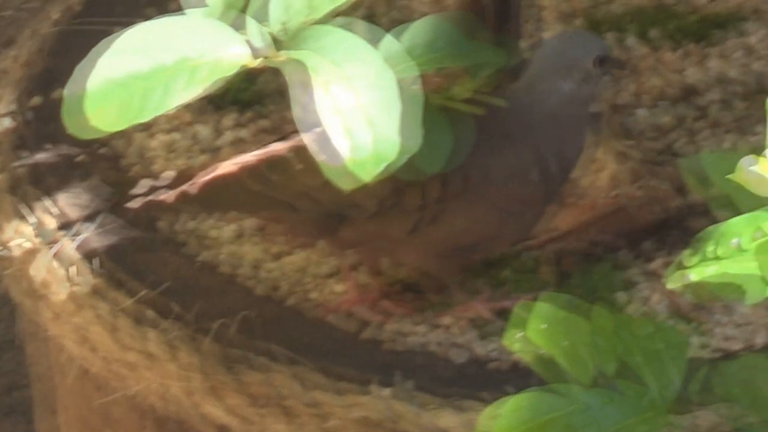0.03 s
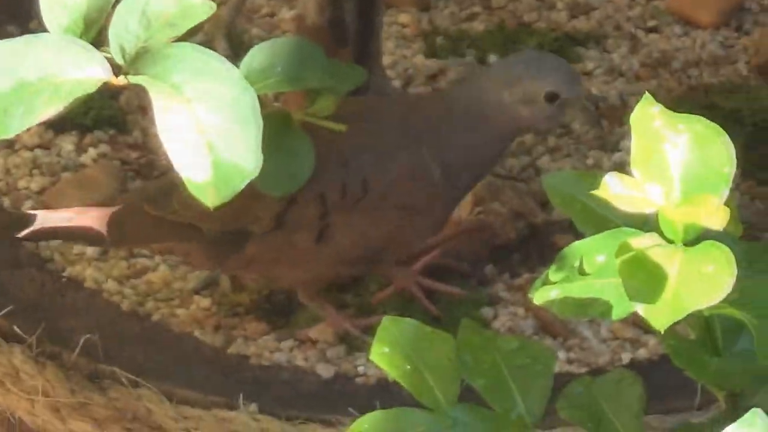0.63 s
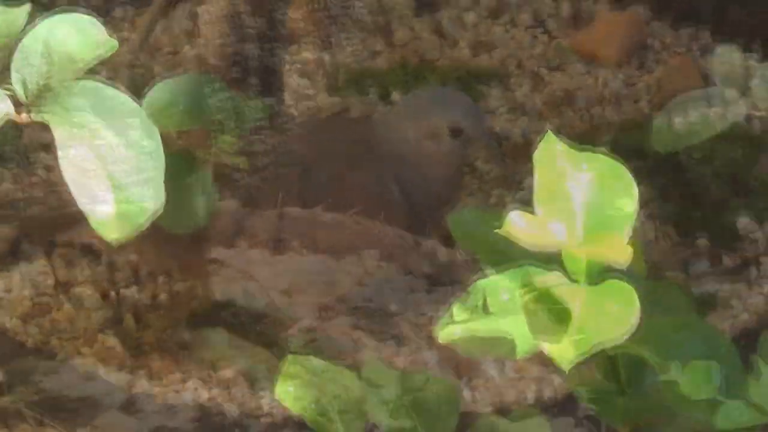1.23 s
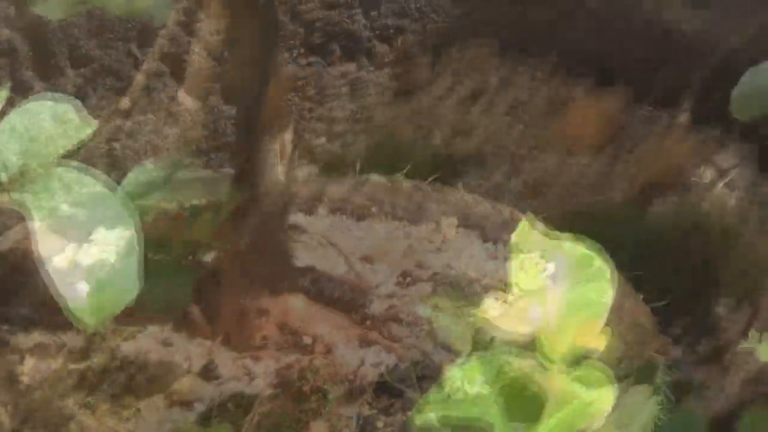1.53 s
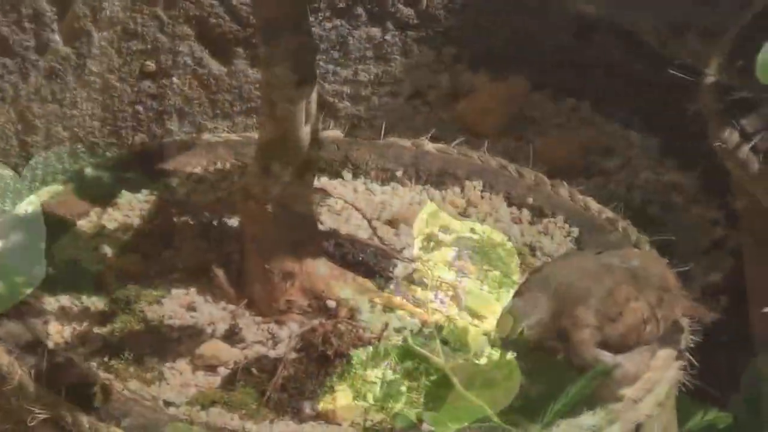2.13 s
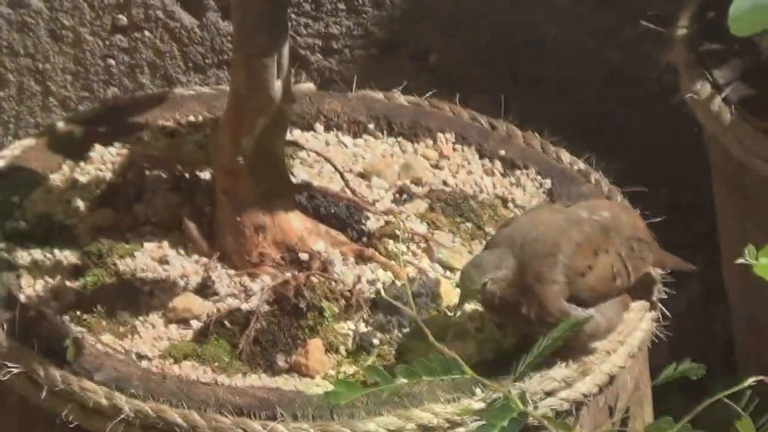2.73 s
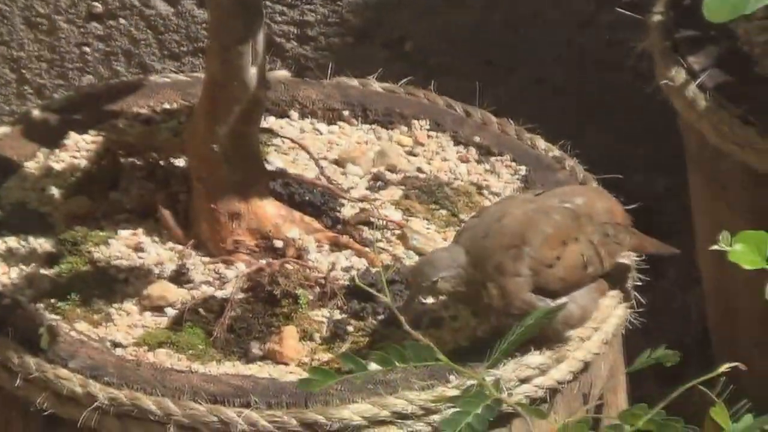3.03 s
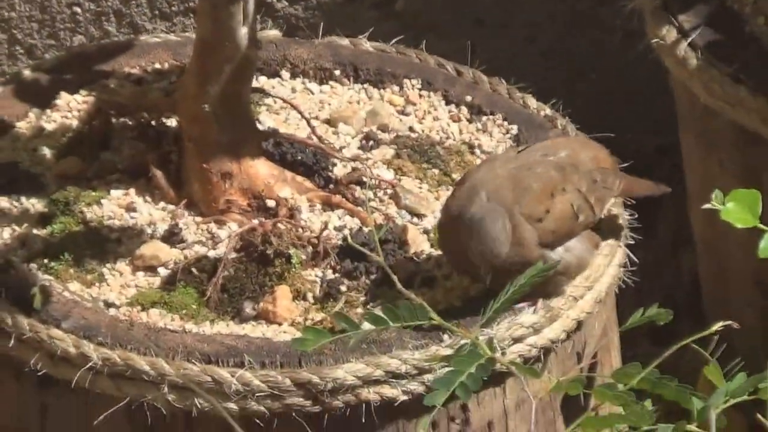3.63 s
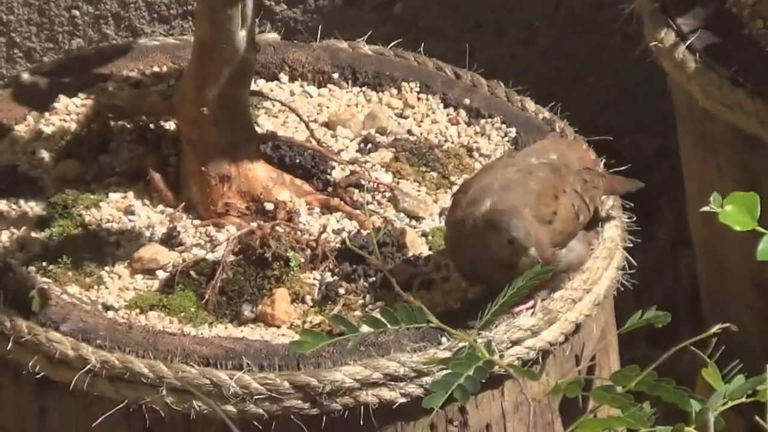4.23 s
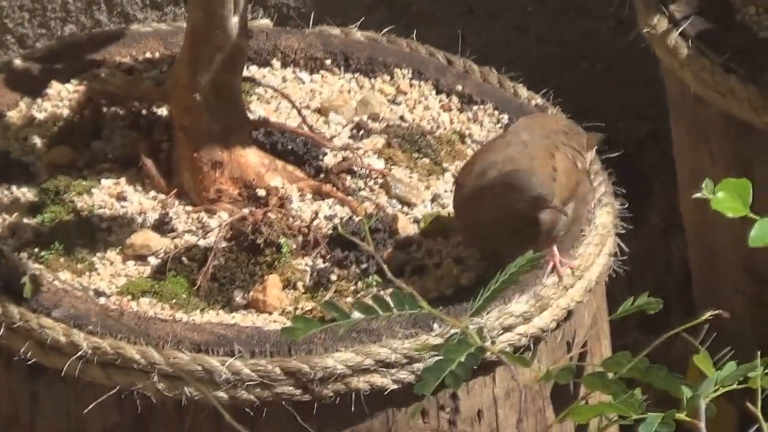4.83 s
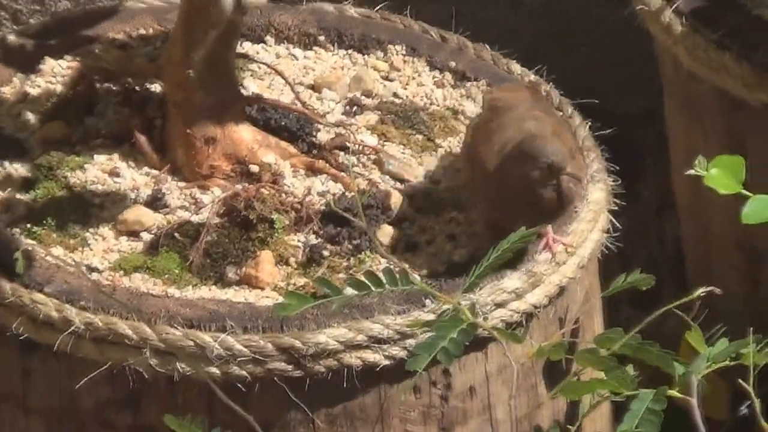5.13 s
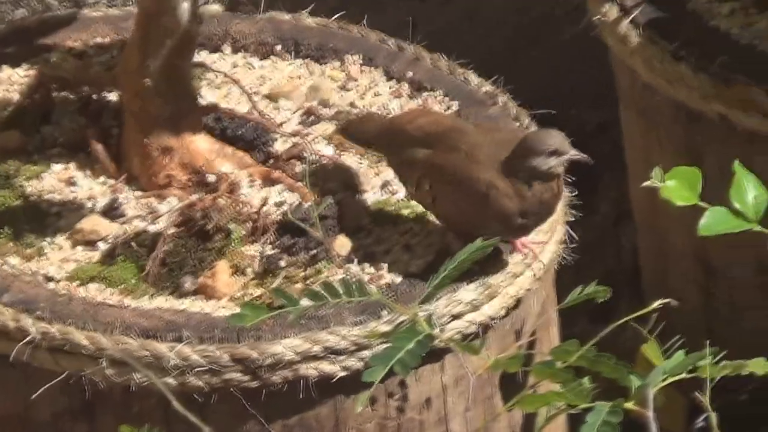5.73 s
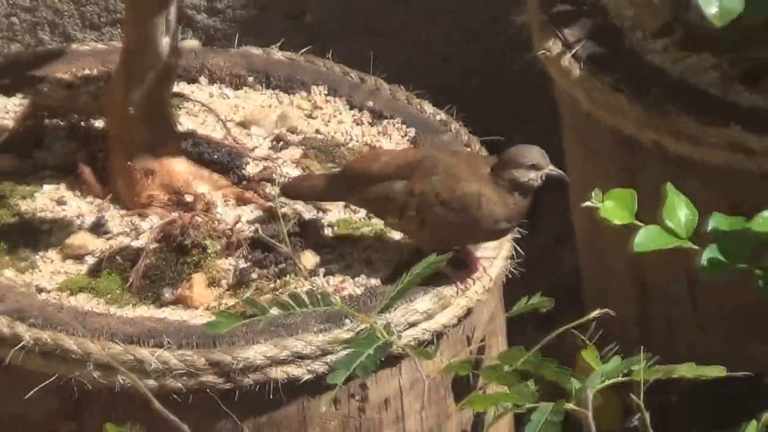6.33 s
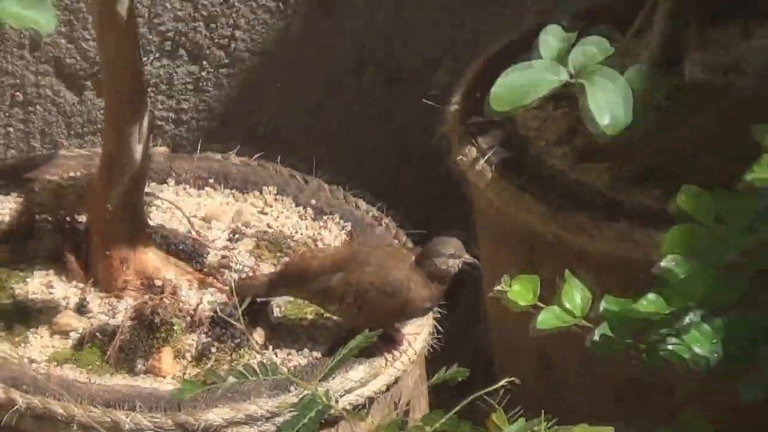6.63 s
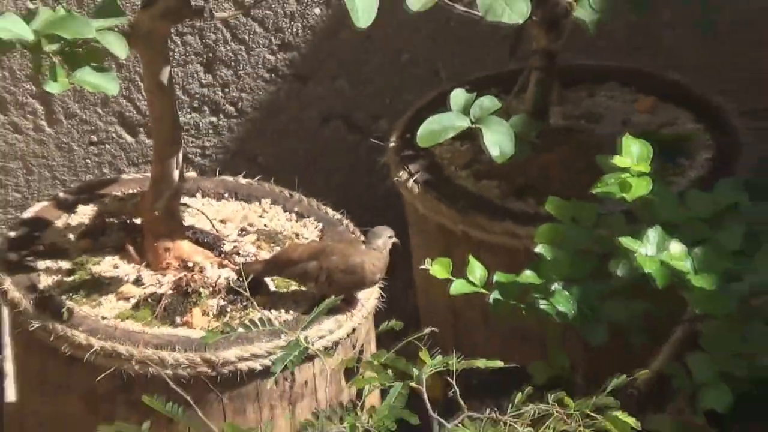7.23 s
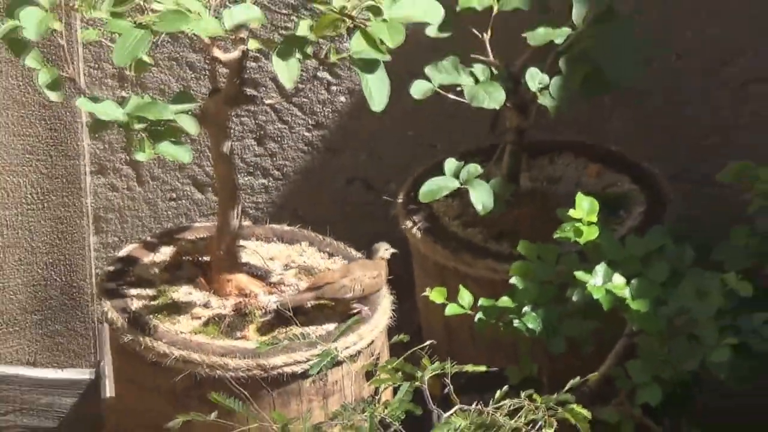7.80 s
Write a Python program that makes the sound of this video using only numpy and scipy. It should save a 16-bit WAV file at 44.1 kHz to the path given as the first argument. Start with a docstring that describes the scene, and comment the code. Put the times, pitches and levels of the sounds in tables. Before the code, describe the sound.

A dove coos softly six times while a small bird chips and trills nearby, over a distant town hum.

```python
"""The hum and rush of a town fill a walled backyard, with faint hoots and bird calls from far off.
Within the first second a ground dove begins six soft two-part coos, near-pure tones hummed through a
closed beak about once a second. From 2.3 s a dove pecks and shuffles in the gravel of a plant pot.
At 4.5 s a small bird bursts into falling chips and a high trill, swept whistles that reverberate
between the walls. After the last coo it closes with a motif sung three times, ever softer."""
import sys
import numpy as np
from scipy import signal
from scipy.fft import rfft, irfft, next_fast_len
from scipy.io import wavfile
from scipy.ndimage import uniform_filter1d, map_coordinates

SR = 44100
rng = np.random.default_rng(int(sys.argv[2]) if len(sys.argv) > 2 else 0)


def put_to_file(sound):
    """Save the sound as 16-bit audio at rate SR, in the file named by the first command-line argument."""
    columns = np.atleast_2d(sound).T  # one column per channel
    safe = np.clip(columns, -1, 1)
    whole_steps = np.round(safe * 32767)
    wavfile.write(sys.argv[1], SR, whole_steps.astype(np.int16))


N = 355578

# diffuse-field coherence of the two microphones: frequency_hz, coherence
COHERENCE = [(60, .45), (180, .38), (500, .66), (700, .52), (1150, .88), (1720, .15), (2350, .85),
             (2950, .25), (3500, .78), (4200, .3), (6000, .55), (8500, .62), (11000, .3), (15000, .3)]
# left microphone relative to right: frequency_hz, gain_db
LEFT_GAIN = [(60, 2), (180, .3), (550, .7), (1650, -1.1), (3800, -1), (6000, -6), (8300, -5), (10000, -7),
             (15000, -10)]
# left microphone behind right: frequency_hz, phase_rad
LEFT_LAG = [(60, 0), (330, 1), (505, 1), (535, .5), (1100, .1), (1650, .3), (1800, 3.1), (2800, 3.3),
            (3000, 6), (3900, 6.6), (4500, 9.3), (6000, 12.7), (7200, 15.6), (8400, 18.9), (15000, 34.5)]
# reverberation time of the yard: frequency_hz, t60_s
YARD_DECAY = [(400, 0.33), (3500, 0.47), (8000, .42), (14000, 0.45)]

# slow course of the traffic, before its gains: time_s, body_db, rush_db
TRAFFIC_LEVELS = [(0.1, -53, -62), (0.76, -56.5, -65), (0.98, -56, -66), (3.15, -54.5, -63),
                  (4.21, -56.3, -63.5), (5.0, -53, -62), (5.35, -53.5, -63), (5.7, -54, -61.5),
                  (6.4, -54.5, -62.5), (7.5, -56.5, -65.5), (7.77, -56, -63), (8.0, -54, -62)]
# noise spectra of traffic body, traffic rush and fine hiss: frequency_hz, density_db
BODY_SPECTRUM = [(18, -20), (30, -17), (50, -0.5), (90, -2), (160, -7), (250, -1.5), (340, 1.5), (430, 0),
                 (600, -5.5), (900, -17.5), (2000, -64)]
RUSH_SPECTRUM = [(250, -35), (500, -2.5), (700, -1.5), (1000, -4.5), (1500, -10.5), (2000, -10.5),
                 (2500, -30.5), (5000, -23.5)]
HISS_SPECTRUM = [(900, -6), (1800, -6.5), (2800, 5), (3700, 2.5), (5000, -1.5), (7000, -3), (8800, -3),
                 (10000, -6), (11300, -3), (12500, -13.5), (15500, -10)]
# course of the engine drone: time_s, level_db
DRONE_LEVELS = [(0.0, -67), (0.09, -47.5), (0.27, -61.5), (0.64, -52.5), (0.89, -64), (0.98, -57.5),
                (1.24, -63.5), (1.85, -57.5), (2.72, -65), (3.05, -58.5), (5.08, -52.5), (7.08, -72),
                (8.0, -65)]
# thin whine of a machine: pitch_hz, level_db
WHINE_TONES = [(11160, -81.5), (14880, -93), (14940, -85)]
# distant hooting tones: start_s, length_s, start_hz, end_hz, level_db
HOOTS = [(.02, .36, 655, 650, -63), (.14, .15, 580, 570, -59.5), (.5, .12, 556, 548, -59.5),
         (1.07, .15, 618, 598, -59.5), (1.39, .12, 552, 547, -60.5), (1.93, .18, 585, 580, -60),
         (2.33, .12, 552, 556, -60), (2.84, .14, 580, 578, -59), (3.1, .15, 835, 865, -65),
         (3.3, .19, 548, 542, -60), (5.29, .13, 400, 420, -54), (5.44, .22, 668, 666, -61),
         (6.33, .15, 622, 605, -60.5)]
# clear peeps and blurred chirps of distant birds: start_s, middle_hz, level_db
DISTANT_PEEPS = [(.565, 3165, -63.5), (.84, 4950, -68), (2.402, 4280, -56.5), (2.405, 6050, -72),
                 (2.41, 3010, -65.5), (2.452, 4010, -58.5), (2.462, 4230, -61), (2.495, 3960, -63),
                 (2.932, 3610, -64.5), (6.385, 4080, -61)]
DISTANT_CHIRPS = [(.22, 1663, -63), (.24, 3580, -68), (1.54, 3700, -70), (2.236, 4300, -66.5),
                  (2.46, 4100, -69), (3.613, 3560, -67), (4.76, 3900, -64), (6.28, 4300, -64),
                  (6.31, 3087, -63), (6.35, 4310, -60)]

# ticks of beak and claw on pebbles: start_s, level_db
PEBBLE_TICKS = [(2.343, -56), (3.0294, -66), (3.7248, -65), (4.2424, -63), (4.5544, -58), (5.781, -44)]
# feet stirring the gravel: start_s, length_s, level_db
FOOT_SHUFFLES = [(2.87, 0.11, -65), (3.0, 0.078, -67), (3.28, 0.058, -66.5), (3.335, 0.1, -62),
                 (3.703, 0.067, -67), (3.974, 0.096, -67.5), (4.135, 0.099, -68), (4.217, 0.051, -64.5)]
# noise spectrum of the gravel: frequency_hz, density_db
GRAVEL_SPECTRUM = [(400, -50), (1500, -1), (3000, -2.5), (6000, -0.5), (9000, 0), (13000, -5.5),
                   (16000, -16)]

# the near bird's chips: start_s, length_s, start_hz, end_hz, relative_db, quiver_ratio
FALLING_CHIPS = [(4.464, .055, 8500, 7100, -54, .055), (4.592, .047, 7310, 5600, -55, .12),
                 (4.631, .075, 8300, 6000, -51.5, .11), (4.705, .055, 8700, 6200, -42.7, .04),
                 (4.764, .04, 7400, 6000, -50, .1), (5.456, .04, 8500, 7900, -53, .045),
                 (5.48, .025, 5950, 5700, -56, .03), (5.625, .03, 8300, 8000, -51, .035),
                 (5.655, .06, 8000, 5900, -47.5, .11), (5.735, .055, 8300, 7700, -49, .06),
                 (5.809, .045, 7990, 7180, -43.5, .06), (5.852, .032, 7960, 6100, -38.5, .04),
                 (5.958, .045, 11100, 9500, -55, .025), (5.991, .04, 7930, 6100, -40, .04),
                 (6.003, .075, 8700, 5650, -41.3, .05)]
# nearly level whistles leading into the two loudest chips: start_s, length_s, level_db
LEAD_IN_NOTES = [(5.79, 0.044, -41.5), (5.831, 0.06, -42), (5.967, 0.031, -43)]
# their glide: start_hz, middle_hz, end_hz
LEAD_IN_PITCHES = (8280, 8060, 7960)
# swell and fade of the trill: time_s, level_db
TRILL_LEVELS = [(4.8, -43.5), (5.16, -39.7), (5.33, -42.5), (5.42, -50)]
# one trill syllable: offset_s, pitch_hz, relative_db
SYLLABLE_SHAPE = [(0, 5700, -13), (.012, 6800, -4), (.024, 7550, -2), (.038, 8350, -1), (.048, 8750, -2),
                  (.056, 8400, -2.5), (.066, 6500, -20)]
# closing motif: offset_s, length_s, start_hz, middle_hz, end_hz, level_db, quiver_ratio
MOTIF_NOTES = [(0, .07, 5300, 5800, 7600, -54, .11), (.06, .06, 7900, 7450, 7050, -44.7, .05),
               (.105, .046, 8700, 7600, 5850, -43.5, .06)]

# coos, timed by the long note; the opening note starts lead_s earlier:
# start_s, lead_s, hold_s, length_s, opening_db, held_db, swell_db, end_db
DOVE_COOS = [(.64, .18, .24, .33, -52, -48.8, -49, -44.5), (1.66, .172, .15, .298, -52, -50.5, -45.8, -40),
             (2.68, .185, .14, .325, -50.8, -50, -46, -44.3),
             (3.675, .17, .15, .28, -52, -48.5, -42.2, -43.3),
             (4.695, .165, .15, .255, -50.8, -46.8, -39.8, -41.8),
             (5.715, .162, .15, .268, -48, -48, -40.2, -41.5)]
# glide of the opening note: length_fraction, pitch_hz
OPENING_GLIDE = [(0, 524), (.5, 511), (1, 499)]
# glide of the long note: scoop_hz, start_hz, held_hz, swell_hz, end_hz
LONG_NOTE_PITCHES = (478, 513, 517, 526, 536)


def amp(db):
    """Amplitude ratio: tenfold for every 20 dB."""
    return 10 ** (np.asarray(db) / 20)


def unit(x):
    """Normalisation to an rms of 1."""
    return x / np.sqrt(np.mean(x ** 2) + 1e-20)


def along(points, hz):
    """Interpolation on a logarithmic frequency axis."""
    knots_hz, values = np.transpose(points)
    return np.interp(np.log(hz + 1), np.log(knots_hz + 1), values)


def curves(rows):
    """Linear interpolation in time: one curve for each column after the first."""
    times, *columns = np.transpose(rows)
    return [np.interp(np.arange(N) / SR, times, column) for column in columns]


def wobble(rate, size=N):
    """Smooth random modulation: a spline through rate knots a second."""
    knots = rng.standard_normal(int(size * rate / SR) + 4)
    return map_coordinates(knots, [np.arange(size) * rate / SR])


def filtered(x, response):
    """Linear filtering: the spectrum is multiplied by a frequency response."""
    size = next_fast_len(N + SR // 2)
    return irfft(rfft(x, size) * response(np.fft.rfftfreq(size, 1 / SR)), size)[..., :N]


def add(track, start_s, sound):
    """Superposition of a sound on a track."""
    part = track[..., max(round(start_s * SR), 0):][..., :sound.shape[-1]]
    part += sound[..., :part.shape[-1]]


def tone(hz):
    """A sinusoid whose phase is the integral of its frequency."""
    return np.sin(2 * np.pi * np.cumsum(hz) / SR)


def gate(t, start, end, edge):
    """An envelope with raised-cosine edges."""
    return np.sin(np.pi / 2 * np.clip(np.minimum(t - start, end - t) / edge, 0, 1)) ** 2


def diffuse_noise(size):
    """Diffuse field: sound from all around is only partly coherent at two microphones."""
    independent = rng.standard_normal((2, size))
    hz = np.fft.rfftfreq(size, 1 / SR)
    angle = np.arccos(np.clip(along(COHERENCE, hz), -1, 1)) / 2
    mid, side = irfft(rfft(independent) * [np.cos(angle), np.sin(angle)], size)
    return np.array([mid + side, mid - side])


def coloured_noise(spectrum, patchy_db):
    """Spectral shaping of diffuse noise to rms 1, its gain fluctuating over time and frequency."""
    bins = signal.stft(diffuse_noise(next_fast_len(N)), nperseg=1024)[2]
    patches = uniform_filter1d(rng.standard_normal(bins.shape[1:]), size=5, axis=0)
    patches = uniform_filter1d(patches, size=12, axis=1)
    pair = signal.istft(bins * amp(patchy_db * unit(patches)), nperseg=1024)[1][:, :N]
    return unit(filtered(pair, lambda hz: amp(along(spectrum, hz))))


def yard(sound, wet_db, build_s=.0047):
    """Reverberation: energy is shared between the direct path and decaying scatter off the walls."""
    hz, t, bins = signal.stft(diffuse_noise(SR // 2), SR, nperseg=256)
    decay = amp(-60 * t / along(YARD_DECAY, hz)[:, None])
    tail = signal.istft(bins * decay, SR, nperseg=256)[1]
    tail *= 1 - np.exp(-np.arange(tail.shape[1]) / SR / build_s)
    paths = amp(wet_db) * tail / np.linalg.norm(tail[0])
    paths[:, 0] += 1  # direct path
    return signal.fftconvolve(sound[None], paths, axes=1)[:, :N] / np.hypot(1, amp(wet_db))


def machine_tone(hz, drift_hz=3):
    """Slight frequency modulation makes a machine's steady tone waver."""
    return unit(tone(hz + drift_hz * wobble(14)))


def town(body_gain_db=4, rush_gain_db=1.5, drone_hz=39.2, hum_hz=119.6, hum_db=-62.5, hiss_db=-65.5):
    """Broadband noise of far traffic and fine hiss superposes on the tones of engine and machine."""
    body_db, rush_db = curves(TRAFFIC_LEVELS)
    body = amp(body_db + body_gain_db) * coloured_noise(BODY_SPECTRUM, patchy_db=.98)
    drift_db = .5 * wobble(5)
    rush = amp(rush_db + rush_gain_db + drift_db) * coloured_noise(RUSH_SPECTRUM, patchy_db=1.5)
    engine = tone(drone_hz * (1 + .0255 * wobble(13))) * amp(1.5 * wobble(9))
    drone = amp(curves(DRONE_LEVELS)[0]) * unit(engine)
    hum = amp(hum_db) * machine_tone(hum_hz)
    whine = sum(amp(db) * np.array([machine_tone(hz), machine_tone(hz)]) for hz, db in WHINE_TONES)
    hiss = amp(hiss_db) * coloured_noise(HISS_SPECTRUM, patchy_db=1.4)
    return body + rush + drone + hum + whine + hiss


def hoot(hz, rough, overtone_db=-38):
    """A fundamental with a weak second harmonic, made husky by random amplitude modulation."""
    t = np.arange(len(hz)) / SR
    pitch = hz * (1 + .006 * wobble(60, len(t)))
    voice = unit(tone(pitch) + amp(overtone_db) * tone(2 * pitch))
    return voice * (1 + rough * wobble(70.7, len(t))) * gate(t, 0, t[-1], edge=.024)


def far_hoots():
    """Faint wavering tones, so distant that reverberation outweighs the direct sound."""
    out = np.zeros(N)
    for start, length, start_hz, end_hz, db in HOOTS:
        add(out, start, amp(db) * hoot(np.linspace(start_hz, end_hz, int(length * SR)), rough=.35))
    return yard(out, wet_db=4)


def whistle(hz, quiver, rasp, subharmonic_db=-26):
    """Modulation spreads a bird's whistle into sidebands; uneven cycles add the octave below."""
    pitch = hz * (1 + quiver * wobble(1103, len(hz)))
    flutter = .2 * wobble(3800, len(hz)) + .105 * wobble(13000, len(hz))  # close skirt, airy skirt
    return (tone(pitch) + amp(subharmonic_db) * tone(pitch / 2)) * (1 + rasp * flutter)


def slur(length, pitches, quiver, rasp, rise):
    """A frequency sweep through three pitches, swelling over the fraction rise of its length."""
    progress = np.linspace(0, 1, int(length * SR))
    hz = np.interp(progress, [0, .5, 1], pitches)
    swell = np.minimum(progress / rise, 1)
    return unit(whistle(hz, quiver, rasp) * swell * gate(progress, 0, .94, edge=.044))


def far_calls(rows, length_s, fall, wet_db, quiver):
    """Downward sweeps, from the fraction fall above each middle pitch to as far below it."""
    out = np.zeros((2, N))
    for start, hz, db in rows:
        pitches = hz * np.array([1 + fall, 1, 1 - fall])
        call = slur(length_s, pitches, quiver, rasp=.2, rise=.091)
        add(out, start, amp(db) * yard(call, wet_db))
    return out


def far_birds():
    """The direct-to-reverberant ratio leaves distant peeps clear and chirps blurred."""
    peeps = far_calls(DISTANT_PEEPS, length_s=.042, fall=.015, wet_db=-4.5, quiver=.025)
    chirps = far_calls(DISTANT_CHIRPS, length_s=.082, fall=.102, wet_db=7, quiver=.0874)
    return peeps + chirps


def gravel(tick_t60_s=.06, grain_db=4):
    """Impact noise: pebbles tick under beak or claw, and crunch irregularly under the feet."""
    t = np.arange(SR // 4) / SR
    envelope = np.zeros(N)
    for start, db in PEBBLE_TICKS:
        add(envelope, start, amp(db - 60 * t / tick_t60_s))
    for start, length, db in FOOT_SHUFFLES:
        grains = unit(amp(grain_db * wobble(618, len(t))))
        add(envelope, start, amp(db) * gate(t, 0, length, edge=.0074) * grains)
    return envelope * coloured_noise(GRAVEL_SPECTRUM, patchy_db=-1.5)


def song_note(length, pitches, db, quiver):
    """One sweep of the near bird, prolonged by reverberation between the walls."""
    return amp(db) * yard(slur(length, pitches, quiver, rasp=1, rise=.094), wet_db=5.5)


def chips(gain_db=.24):
    """Fast downward sweeps are heard as chips; the loudest grow out of a narrower-band whistle."""
    out = np.zeros((2, N))
    for start, length, start_hz, end_hz, db, quiver in FALLING_CHIPS:
        pitches = np.linspace(start_hz, end_hz, 3)
        add(out, start, song_note(length, pitches, db + gain_db, quiver))
    for start, length, db in LEAD_IN_NOTES:
        add(out, start, song_note(length, LEAD_IN_PITCHES, db, quiver=.026))
    return out


def syllable():
    """Frequency modulation: a rasping whistle climbs, then flicks down."""
    times, hz, db = np.transpose(SYLLABLE_SHAPE)
    t = np.arange(int(times[-1] * SR)) / SR
    voice = whistle(np.interp(t, times, hz), quiver=.047, rasp=.86)
    return unit(voice * amp(np.interp(t, times, db)) * gate(t, 0, times[-1], edge=.0021))


def trill(start_s=4.801, period_s=.0875, count=8):
    """Periodic repetition of one syllable under an envelope that swells and fades."""
    out = np.zeros(N)
    for onset in start_s + period_s * np.arange(count):
        db = np.interp(onset, *np.transpose(TRILL_LEVELS))
        add(out, onset, amp(db) * syllable())
    return yard(out, wet_db=4)


def closing_motifs(start_s=6.147, period_s=.22, fade_db=3.5, count=3):
    """A husky upsweep and two quick chips recur, their amplitude falling geometrically."""
    out = np.zeros((2, N))
    for k in range(count):
        for offset, length, *pitches, db, quiver in MOTIF_NOTES:
            add(out, start_s + k * period_s + offset, song_note(length, pitches, db - k * fade_db, quiver))
    return out


def near_bird(right_db=1.5):
    """The small bird's song; a level difference between channels shifts chips and motifs rightward."""
    balance = amp([[-right_db / 2], [right_db / 2]])
    return trill() + (chips() + closing_motifs()) * balance


def dove(opening_s=.118, scoop_s=.045, scoop_db=-11, dip_db=-3, echo_s=.082, echo_db=-13.5):
    """Two near-pure notes hummed through a closed beak; a house wall reflects them as an echo."""
    out = np.zeros((2, N))
    opening_hz = np.interp(np.linspace(0, 1, int(opening_s * SR)), *np.transpose(OPENING_GLIDE))
    for start, lead, hold, length, opening_db, held_db, swell_db, end_db in DOVE_COOS:
        voice, echo = np.zeros((2, SR))
        add(voice, 0, amp(opening_db) * hoot(opening_hz, rough=.33))
        # the long note scoops up, holds, dips in level and lifts into a clearer swell
        t = np.arange(-scoop_s, length, 1 / SR)
        hz = np.interp(t, [-scoop_s, scoop_s / 2, hold / 2, hold, length], LONG_NOTE_PITCHES)
        stages_db = [held_db, held_db + dip_db, swell_db, end_db]
        level_db = np.interp(t - hold, [-.04, -.01, .026, length - hold], stages_db)
        level_db += np.interp(t, [0, scoop_s / 2], [scoop_db, 0])
        rough = np.interp(t, [0, hold, length], [.26, .17, .11])
        add(voice, lead - scoop_s, amp(level_db) * hoot(hz, rough))
        add(echo, echo_s, amp(echo_db) * voice)
        coo = yard(voice + echo, wet_db=-7)[:, :SR]
        add(out, start - lead, voice.std() * unit(coo))  # same rms as the voice alone
    return out


def scene():
    """Superposition of the birds, the gravel and the town."""
    return dove() + near_bird() + far_birds() + far_hoots() + gravel() + town()


def record(dry, top_hz=15550):
    """Phase and level differences leave the left microphone later and duller; both are band-limited."""
    sides = np.array([[.5], [-.5]])

    def response(hz):
        return amp(sides * along(LEFT_GAIN, hz)) * np.exp(-1j * sides * along(LEFT_LAG, hz))

    return filtered(filtered(dry, response), lambda hz: hz < top_hz)


dry = scene()
out = record(dry)
put_to_file(out)
```